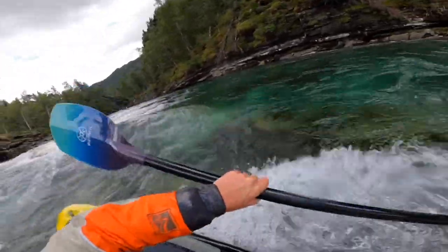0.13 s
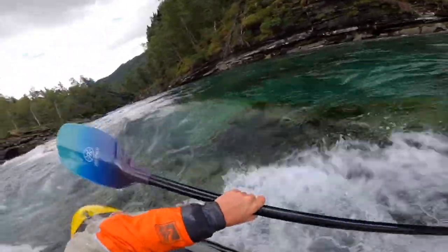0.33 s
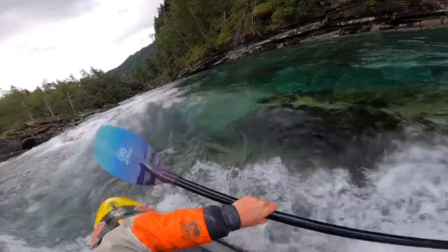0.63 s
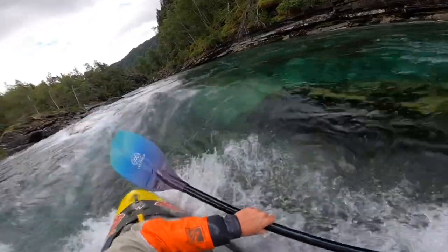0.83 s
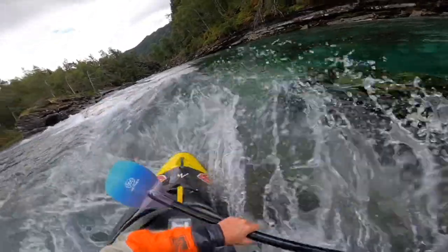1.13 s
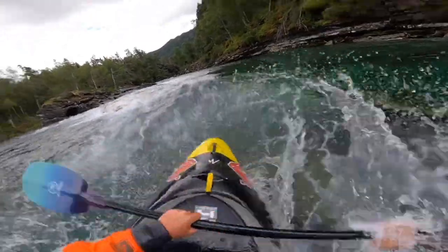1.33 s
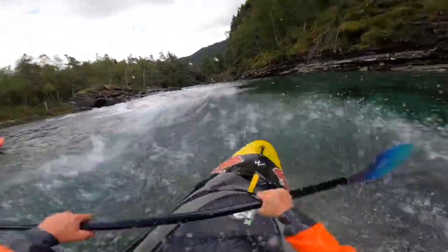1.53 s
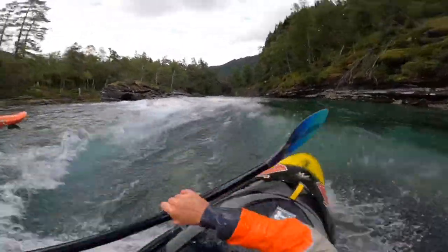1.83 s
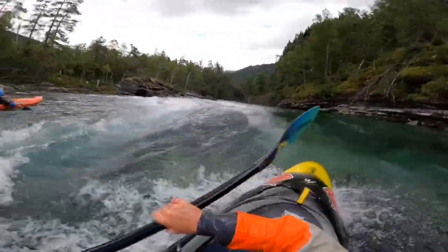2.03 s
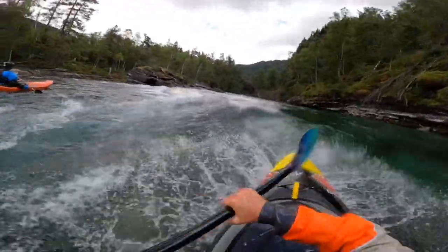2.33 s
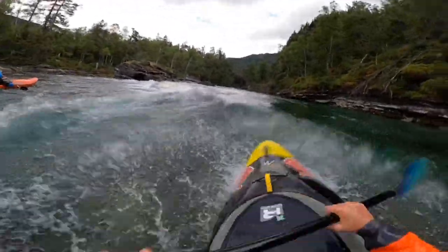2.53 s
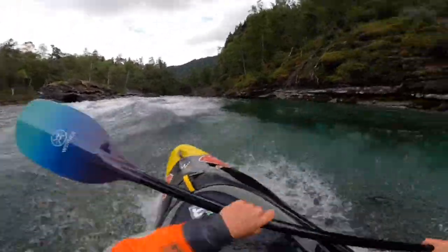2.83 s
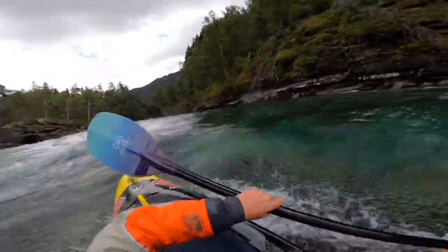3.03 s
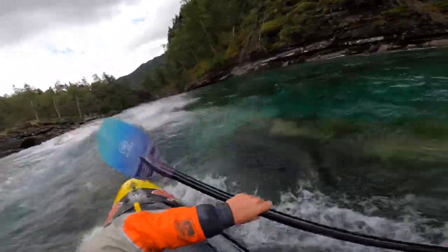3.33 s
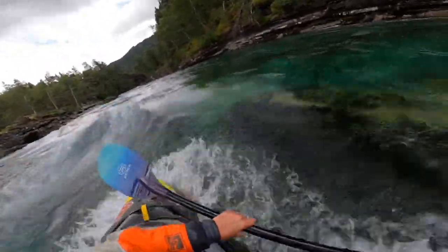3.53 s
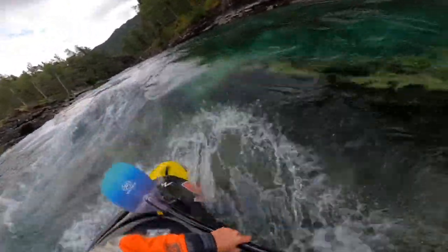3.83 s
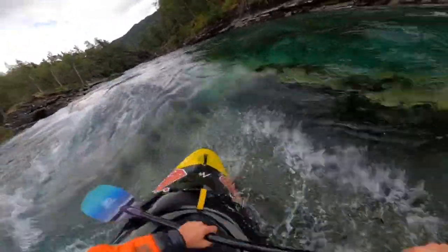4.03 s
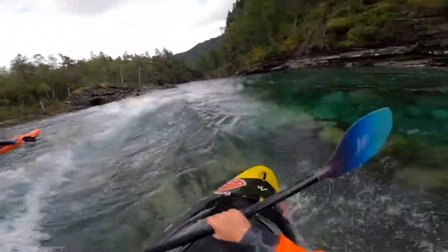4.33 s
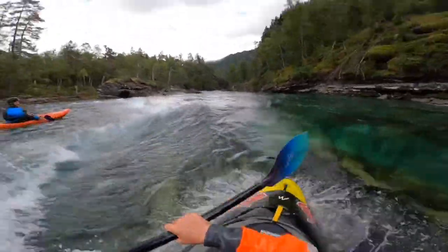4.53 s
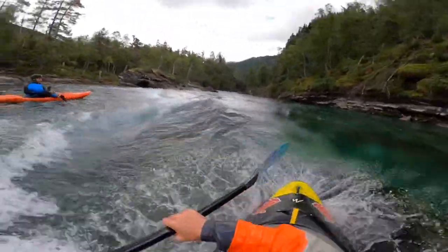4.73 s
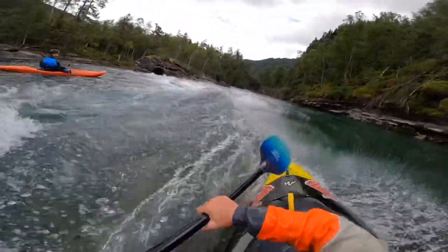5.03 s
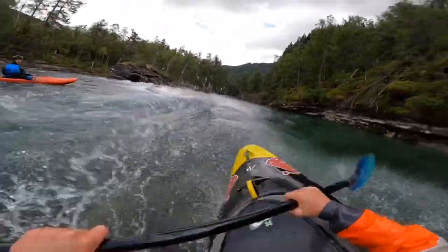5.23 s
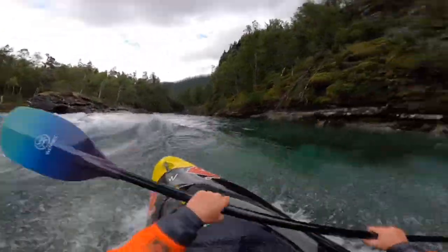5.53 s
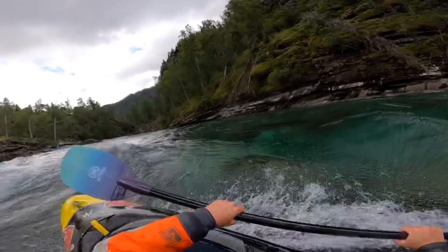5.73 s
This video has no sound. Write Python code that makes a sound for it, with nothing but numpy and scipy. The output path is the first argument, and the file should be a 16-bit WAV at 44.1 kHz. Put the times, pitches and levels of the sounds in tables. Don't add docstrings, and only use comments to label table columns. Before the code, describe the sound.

Muffled, boomy whitewater roars steadily close by, with gulping bubbles, hollow hull slaps and a low rumble of wind.

```python
import sys
import numpy as np
from scipy import signal
from scipy.fft import rfft, irfft, next_fast_len
from scipy.io import wavfile
from scipy.ndimage import uniform_filter1d, minimum_filter1d

SR = 44100
rng = np.random.default_rng(int(sys.argv[2]) if len(sys.argv) > 2 else 0)


def bounce(signal):
    frames = np.transpose(np.atleast_2d(signal))
    limited = np.clip(frames, -1, 1)
    pcm = np.round(limited * 32767).astype(np.int16)
    wavfile.write(sys.argv[1], SR, pcm)


def gain_from_decibels(decibels):
    exponent = np.asarray(decibels, float) / 20
    return 10 ** exponent


N = 259737

# [t/s, level/dB]
FOAM_VIGOUR = [(0, -14.5), (0.3, -13.5), (0.7, -13), (1.25, -13), (1.7, -14.0), (1.95, -14.0),
               (2.25, -13.0), (2.5, -14.5), (2.75, -15.5), (3.15, -14), (3.6, -16.5), (3.85, -15),
               (4.1, -15.5), (4.3, -15.5), (4.65, -14.5), (4.9, -13), (5.6, -14.5), (5.89, -12.5)]
# [t/s, level/dB]
HULL_PUSH = [(0, -16), (0.25, -19), (0.55, -18.5), (0.85, -20.0), (1.1, -17.5), (1.4, -22), (1.75, -25),
             (2.25, -20), (2.6, -22.5), (3, -22), (3.4, -17), (3.75, -20.5), (3.95, -20.5), (4.25, -25),
             (4.55, -22.5), (5.1, -20.5), (5.6, -21.0), (5.89, -18.0)]
# [t/s, level/dB]
SPRAY_THROWN = [(0, -33.5), (0.25, -35.0), (0.65, -32.5), (0.95, -34), (1.2, -32.5), (1.85, -33.5),
                (2.15, -31.0), (2.8, -32.5), (3.1, -34), (3.6, -35.5), (3.95, -33.5), (4.25, -37),
                (4.55, -34.5), (4.85, -30.5), (5.2, -31.5), (5.4, -30), (5.7, -32), (5.89, -33.5)]
# [f/Hz, share of push, of vigour, of spray]
BUBBLE_FOLLOWS = [
    (200, 1, 0.2, 0),
    (460, .2, 1, 0),
    (800, 0.04, 1.1, .01),
    (1250, 0.02, 0.6, .3),
    (2000, 0, 0.2, 1),
    (4200, 0, 0.12, 1.02),
    (10000, 0, .01, 1.72),
]
# [t/s, level/dB, f/Hz]
BUBBLE_HEAVES = [(.24, 6, 60.3), (.18, 4, 200), (.26, 2, 200), (.26, -3, 800), (0.679, 2.5, 460),
                 (.93, -5, 460), (1.09, 5, 460), (1.16, -5.5, 460), (1.34, 2, 800), (1.39, 2.5, 460),
                 (1.6, -5, 200), (1.95, 5, 301.4), (2.18, 4, 501), (2.25, -3.5, 600), (2.46, -6, 200),
                 (4.51, 4, 95), (3.21, 5, 397), (3.42, 4.5, 60), (3.87, -4.5, 652), (5.56, 6, 55),
                 (4.14, 2.5, 800), (4.27, -6.5, 200), (4.83, 5, 460), (4.83, 2, 1200), (4.94, -6, 460),
                 (4.97, 3.5, 653), (5.088, 3.5, 1200), (.1, -3, 2990), (.92, -2, 3000), (4.03, -3, 3500)]
# [f/Hz, level/dB per Hz]
MEMBRANE_COLOUR = [(65, -23), (150, -4.5), (500, -6), (790, -1), (965, -2), (1150, -4.5), (1410, -15),
                   (2140, -29), (3700, -41.5), (5000, -54.5), (6100, -68.5), (8500, -72.5), (10300, -78),
                   (12000, -105)]
# [f/Hz, width/Hz, level/dB]
HOUSING_CAVITIES = [
    (997, 13, -6),
    (1060.5, 50, -10),
    (6930, 1500, 7),
]
# [t/s, peak level/dB, f/Hz]
AIR_POCKETS = [
    (1.828, -2.5, 770),
    (2.018, -1, 785),
    (2.1, 4.5, 840),
    (2.3, -1, 830),
    (2.435, -5, 753),
    (2.499, 0.5, 928),
    (4.323, -7.5, 783),
    (4.869, -2, 750),
]
# [t/s, peak level/dB, f/Hz]
HULL_SLAPS = [
    (0.234, -10, 65),
    (1.099, 0.5, 173),
    (2.299, -6.5, 165),
    (3.94, -10, 129),
    (4.499, -13.5, 95),
    (5.081, -5, 165),
    (5.548, -16, 60.4),
]
# [t/s, peak level/dB, f/Hz]
HOUSING_DROPS = [
    (0.3193, -19.5, 2470),
    (2.2727, -27, 2380),
    (4.3635, -44, 4800),
    (5.0194, -35, 2290),
    (5.3986, -24, 2200),
]
# [t/s, level/dB]
WIND_ON_PORT = [(0, -25), (0.25, -23.5), (0.6, -31.5), (0.9, -35.5), (1.2, -32.5), (1.45, -44.0),
                (2, -38.5), (2.35, -46), (2.8, -39.0), (3.2, -39.5), (3.45, -32.5), (3.9, -34), (4.2, -40),
                (4.5, -45), (4.8, -42), (5.3, -42), (5.55, -33.0), (5.89, -31.5)]
# [t/s, level/dB]
PORT_OPENING = [(0, -74), (.16, -74), (.24, -105), (.98, -105), (1.03, -90.5), (1.3, -68), (1.64, -70),
                (1.78, -75.5), (2.4, -71.5), (2.7, -73.5), (3.15, -80), (3.6, -73), (3.95, -68), (4.2, -77),
                (4.45, -79), (4.95, -69.5), (5.65, -75.5), (5.89, -73.5)]


def foam(burst_per_s, size_db, burst_share, shared_db, own_db, level_db):
    controls_db = np.array([swing(HULL_PUSH), swing(FOAM_VIGOUR), swing(SPRAY_THROWN)])
    table_hz, *shares = np.transpose(BUBBLE_FOLLOWS)

    blur = rng.standard_normal((2, N))
    sizes_db = size_db * np.minimum(rng.exponential(1, (2, N)), 5)
    signs = rng.choice([-1, 1], (2, N))
    bursts = rms_one(gain_from_decibels(sizes_db) * signs * (rng.random((2, N)) < burst_per_s / SR))
    water = np.sqrt(1 - burst_share) * blur + np.sqrt(burst_share) * bursts

    edges = 50 * 2 ** (np.arange(25) / 3)
    lumps = drift(14.0)
    neighbour = drift(12.0)
    out = np.zeros(N)
    for k, (low, high) in enumerate(zip(edges, edges[1:])):
        hz = np.sqrt(low * high)
        weights = np.array([np.interp(np.log(hz), np.log(table_hz), column) for column in shares])
        surge_db = weights @ controls_db + heaves(hz)
        own = drift(13.0)
        flicker = np.clip(0.28 + 0.24 * np.log2(hz / 200), 0.26, 1.26)
        flicker_db = shared_db * lumps * flicker + own_db * (own + neighbour)
        neighbour = own
        bubbles = evened(band(water[k % 2], low, high), span_s=0.17, share=0.55)
        out += gain_from_decibels(surge_db + flicker_db) * bubbles
    return gain_from_decibels(level_db) * rms_one(through_membrane(out))


def heaves(hz):
    bell_s, reach_octaves = 0.039, 0.5
    s, db, pitch_hz = np.transpose(BUBBLE_HEAVES)
    t = np.arange(0, N, 64) / SR
    near_db = db * np.exp(-(np.log2(hz / pitch_hz) / reach_octaves) ** 2)
    bells = np.exp(-((t - s[:, None]) / bell_s) ** 2)
    return np.interp(np.arange(N) / SR, t, near_db @ bells)


def through_membrane(x):
    size = next_fast_len(N + 4096)
    hz = np.maximum(np.arange(size // 2 + 1) * SR / size, 1)
    table_hz, table_db = np.transpose(MEMBRANE_COLOUR)
    colour_db = np.interp(np.log(hz), np.log(table_hz), table_db)
    for cavity_hz, width_hz, depth_db in HOUSING_CAVITIES:
        colour_db += depth_db / (1 + (2 * (hz - cavity_hz) / width_hz) ** 2)
    return irfft(rfft(x, size) * gain_from_decibels(colour_db), size)[:N]


def air_pockets(level_db):
    return gain_from_decibels(level_db) * rings(AIR_POCKETS, cycles=70.0, rise=0.97, glide=0.0016)


def hull_slaps(level_db):
    return gain_from_decibels(level_db) * rings(HULL_SLAPS, cycles=14.0, rise=0.93, glide=0.0038)


def drumming(lumps):
    level_db = -30 + 0.69 * swing(HULL_PUSH) + 0.3 * swing(WIND_ON_PORT) + heaves(82)
    noise = band(rng.standard_normal(N + SR), 67, 125)[SR:]
    return lumps * gain_from_decibels(level_db) * rms_one(evened(noise, span_s=0.065, share=0.68))


def drops(dull_hz):
    ticks = rings(HOUSING_DROPS, cycles=20, rise=0.27, glide=0)
    return band(ticks, 1200, dull_hz)


def gusts(lumps):
    level_db = -37 + swing(WIND_ON_PORT) + heaves(40)
    noise = band(rng.standard_normal(N + SR), 24, 60)[SR:]
    return lumps * gain_from_decibels(level_db) * rms_one(evened(noise, span_s=0.13, share=0.6))


def second_port(patchy_db):
    hiss = band(rng.standard_normal(N), 11900, 18000, order=10)
    hiss = band(hiss, 9000, 14500, order=1)
    level_db = in_time(PORT_OPENING)[0] + patchy_db * drift(15.0)
    return gain_from_decibels(level_db) * rms_one(hiss)


def rings(events, cycles, rise, glide):
    out = np.zeros(N + SR)
    for s, peak_db, hz in events:
        turns = np.arange(SR // 4) / SR * hz
        shape = gain_from_decibels(-60 * turns / cycles) * (1 - np.exp(-turns / rise))
        wave = np.sin(2 * np.pi * turns * (1 + glide * turns))
        out[round(s * SR):][:len(wave)] += gain_from_decibels(peak_db) * shape / shape.max() * wave
    return out[:N]


def evened(x, span_s, share):
    swell = uniform_filter1d(x ** 2, int(span_s * SR)) + 1e-12
    return x * (np.mean(swell) / swell) ** (share / 2)


def drift(rate):
    r = np.exp(-80 * np.pi * rate / SR)
    slow = signal.lfilter([1], [1, -2 * r, r * r], rng.standard_normal(N // 40 + 2002))[2000:]
    return np.interp(np.arange(N) / 40, np.arange(len(slow)), rms_one(slow))


def swing(rows):
    db, = in_time(rows)
    return db - db.mean()


def in_time(rows):
    s, *columns = np.transpose(rows)
    return np.array([np.interp(np.arange(N) / SR, s, c) for c in columns])


def band(x, low_hz, high_hz, order=2):
    return signal.sosfilt(signal.butter(order, [low_hz, high_hz], "band", fs=SR, output="sos"), x)


def rms_one(x):
    return x / np.sqrt(np.mean(x ** 2) + 1e-20)


def scene():
    water = foam(burst_per_s=1500, size_db=3.5, burst_share=0.16, shared_db=0.54, own_db=0.32, level_db=-13)
    water += air_pockets(level_db=-7.5)
    lumps = gain_from_decibels(1.55 * drift(8.3))
    hull = hull_slaps(level_db=-7) + drumming(lumps)
    air = gusts(lumps) + second_port(patchy_db=1.5)
    return (water + hull + drops(dull_hz=6500) + air)[None]


def roll_off(x):
    return signal.sosfilt(signal.butter(12, 15750, fs=SR, output="sos"), x)


def record(dry):
    room = np.minimum(1, 0.89 / (abs(dry) + 1e-9))
    gain = uniform_filter1d(minimum_filter1d(room, size=401, axis=1), size=401, axis=1)
    fade = np.sin(np.pi / 2 * np.minimum(np.arange(N)[::-1] / (0.002 * SR), 1)) ** 2
    return roll_off(dry * gain * fade)


dry = scene()
out = record(dry)
bounce(out)
```